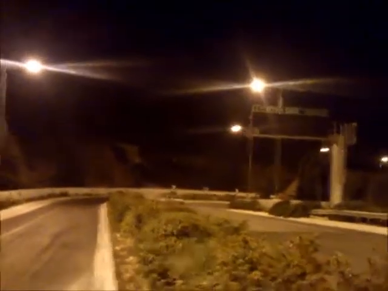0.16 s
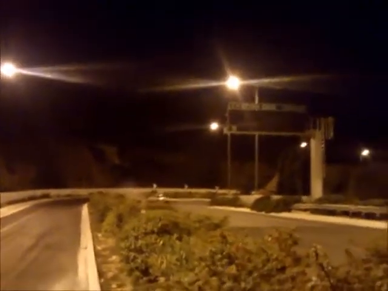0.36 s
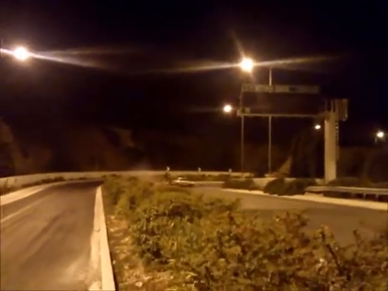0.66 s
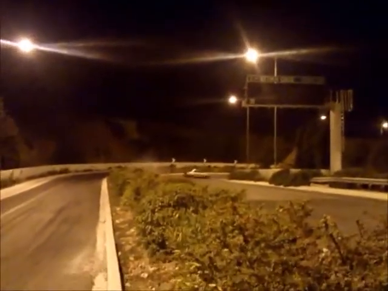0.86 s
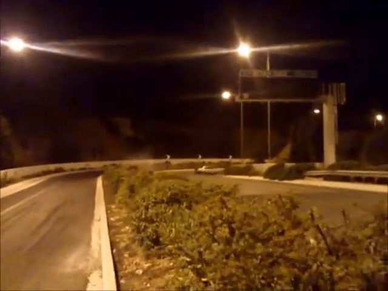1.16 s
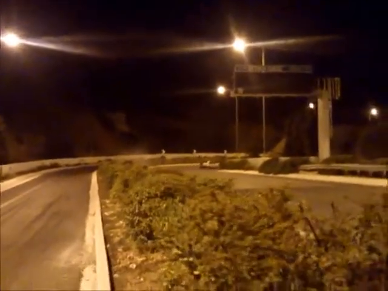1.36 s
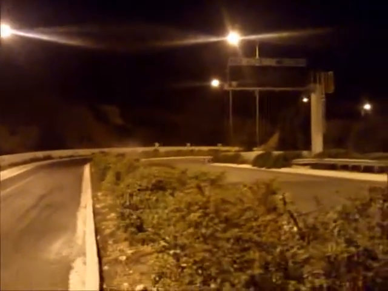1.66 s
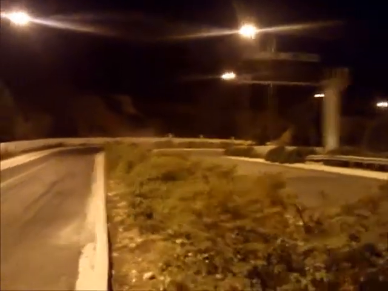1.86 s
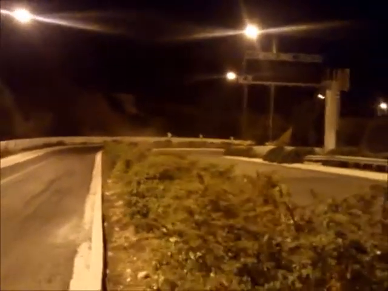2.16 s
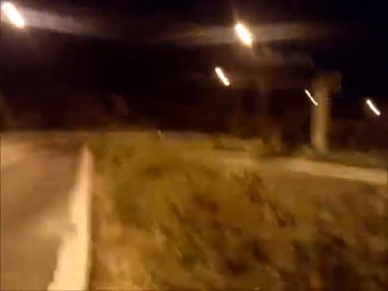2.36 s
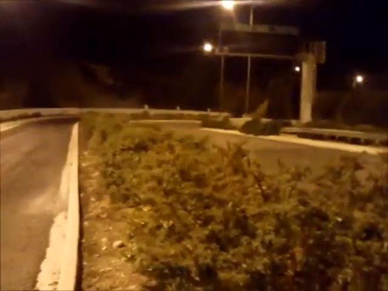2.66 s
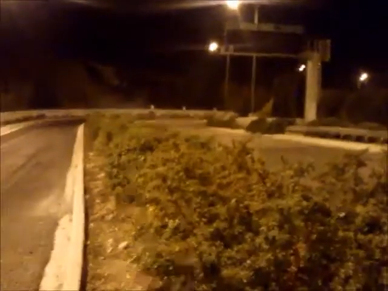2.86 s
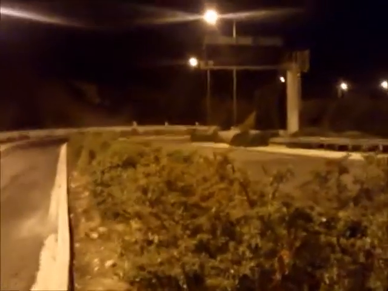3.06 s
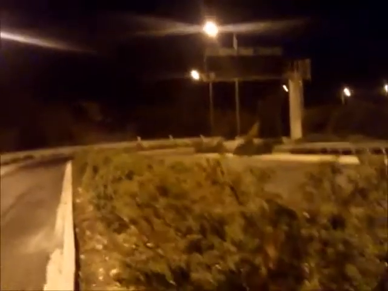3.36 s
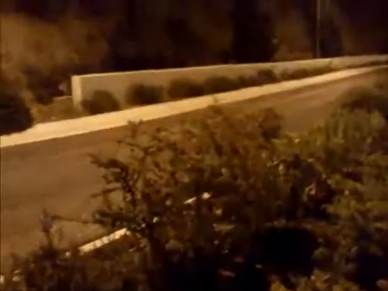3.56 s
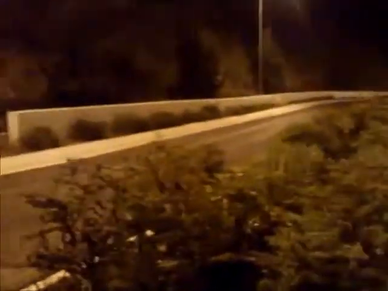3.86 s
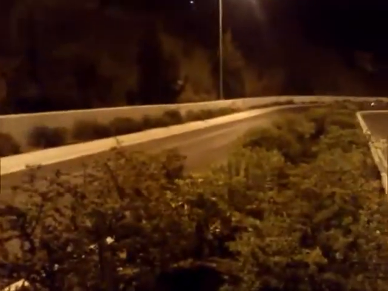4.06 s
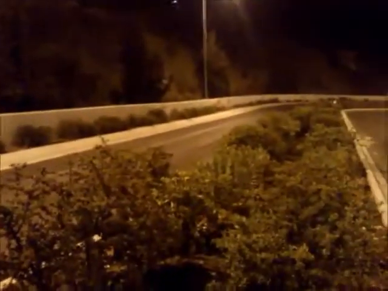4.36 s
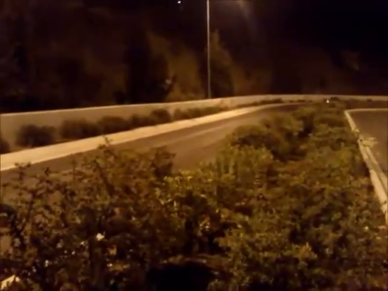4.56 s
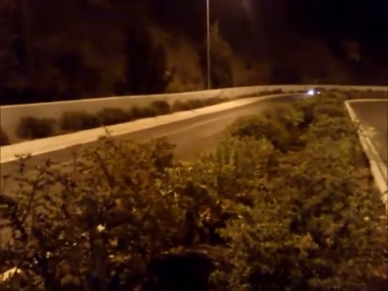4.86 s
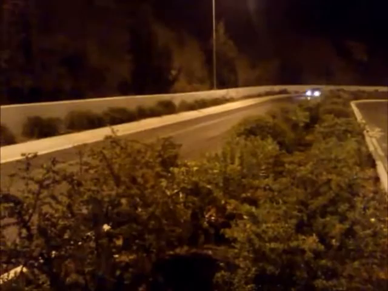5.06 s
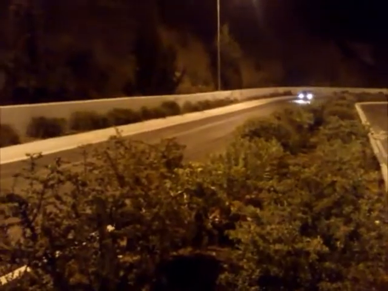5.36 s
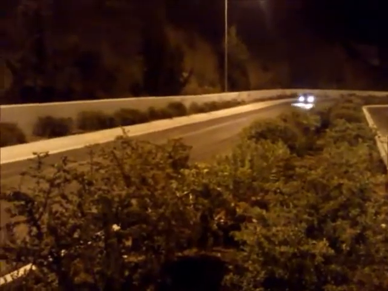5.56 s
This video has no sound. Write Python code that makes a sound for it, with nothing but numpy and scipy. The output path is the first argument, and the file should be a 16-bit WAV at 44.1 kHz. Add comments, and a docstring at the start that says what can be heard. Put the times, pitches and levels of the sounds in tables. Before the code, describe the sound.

Outdoors at night, a four-cylinder car some way off holds high revs while its tyres squeal in a juddering slide. It stumbles briefly, the squeal stops and it fades away. Fingers tick and rub the handheld camera, mostly left. An abrupt cut brings the engine back louder, pulling hard, then a sharp new squeal and steady high revs.

```python
"""Sliding car, away and back

A four-cylinder car holds high revs and slides on squealing tyres along a road, some way off.
It misfires briefly and fades into the distance; after a splice it is back, nearer and head-on.
Engine orders are sines, tyre squeals are wavering harmonic bands, roar and scrub are shaped noise.
Noise ticks and rubs of fingers sit mostly left; the two channels hear the car out of phase."""
import sys
import numpy as np
from scipy import signal
from scipy.fft import rfft, irfft, next_fast_len
from scipy.io import wavfile
from scipy.ndimage import uniform_filter1d, map_coordinates

SR = 44100
rng = np.random.default_rng(int(sys.argv[2]) if len(sys.argv) > 2 else 0)


def pcm_store(signal):
    """Save signal as 16-bit PCM."""
    levels = np.round(np.clip(np.atleast_2d(signal), -1, 1) * 32767)
    wavfile.write(sys.argv[1], SR, levels.astype(np.int16).T)


N = 251811
T = np.arange(N) / SR
SPLICE_S = 3.503  # the car leaves before this and returns after it
NEAR_DB = -33  # road roar of a near car, the reference for distance

# Tyre noise by distance, one list leaving and one returning: start_s [s], roar_db [dB], scrub_db [dB]
ROAD = [
    [(0, -32, -34), (.5, -31, -31.5), (1.5, -32.5, -45), (2.1, -36.5, -49), (2.55, -48.5, -58),
     (3.49, -59.5, -60)],
    [(3.5, -42, -43.5), (4.0, -41.5, -42), (4.2, -35.5, -34.5), (4.6, -37, -36), (4.95, -40.5, -36),
     (5.71, -36, -35.5)],
]
# Spectrum of low rumble, also used for exhaust puffs: freq_hz [Hz], relative_density_db [dB per Hz]
RUMBLE = [(12, -44.5), (20, -15.5), (107, -14), (152, -7), (300, -19), (600, -24), (800, -46), (1100, -120)]


def amp(db):
    """Decibels to gain."""
    return 10 ** (np.asarray(db) / 20)


def unit(x):
    """x at rms 1."""
    return x / np.sqrt(np.mean(x ** 2) + 1e-20)


def along(points, hz):
    """Interpolate (Hz, value) points on a log frequency axis."""
    f, v = np.transpose(points)
    return np.interp(np.log(hz + 1), np.log(f + 1), v)


def curves(tables):
    """One value per sample for each column after the time."""
    s, *cols = np.concatenate(tables).T
    return [np.interp(T, s, c) for c in cols]


def wobble(rate):
    """A smooth random curve, rate knots a second."""
    knots = rng.standard_normal(int(N * rate / SR) + 4)
    return map_coordinates(knots, [T * rate], order=2)


def window(start, end, edge):
    """A gate between start and end, with ramps edge seconds long."""
    return np.clip(np.minimum(T - start, end - T) / edge + .5, 0, 1)


def filtered(x, response):
    """x times a complex response of frequency."""
    m = next_fast_len(N + SR // 2)
    spectrum = rfft(x, m) * response(np.fft.rfftfreq(m, 1 / SR))
    return irfft(spectrum, m)[..., :N]


def rush(spectrum, patchy_db):
    """Shaped noise of rms 1, its gain varied in random patches of time and frequency."""
    z = signal.stft(rng.standard_normal(N), nperseg=512)[2]
    field = uniform_filter1d(rng.standard_normal(z.shape), 6, 0)
    field = uniform_filter1d(field, 10, 1)
    patchy = signal.istft(z * amp(patchy_db * unit(field)), nperseg=512)[1][:N]
    return unit(filtered(patchy, lambda hz: amp(along(spectrum, hz))))


def distant_rumble():
    """Low noise, mostly distant traffic, that follows the car's distance only a little."""
    level_db, follows = -42.5, 0.2  # follows: share of the road roar's change in dB
    roar_db = curves(ROAD)[0]
    return amp(level_db + follows * (roar_db - NEAR_DB)) * rush(RUMBLE, patchy_db=2.5)


def fingers():
    """Skin ticks and rubs near the left port as noise; shifts of grip as low bumps that sag in pitch."""
    # Finger ticks on the case: start_s [s], blow_db [dB, before the case colours it]
    ticks = [(1.776, -15), (2.347, -25.5), (2.381, -26.5), (2.3869, -8.5), (2.4006, -19), (2.408, -5.5),
             (2.4217, -14), (2.903, -44.5), (3.012, -43.5)]
    # Finger rubs: start_s [s], end_s [s], level_db [dB, before the case colours it]
    rubs = [(1.83, 1.87, -35), (2.395, 2.425, -23.5), (2.372, 2.44, -33), (2.43, 2.474, -36),
            (2.46, 2.505, -49), (2.728, 2.742, -54), (2.33, 2.37, -48)]
    # Grip shifts: start_s [s], peak_db [dB], settled_pitch_hz [Hz]
    bumps = [(2.084, -23.5, 119.1), (2.107, -25, 142), (2.399, -26, 151), (2.407, -18.5, 134.2), ]
    # Colour of the case: freq_hz [Hz], gain_db [dB]
    case_colour = [(250, -22.5), (1000, -2.5), (2190, -9.5), (4470, -0.5), (6450, -8.5), (8610, -4),
                   (15700, -27)]
    tick_fall_s, bump_fall_s = 0.0076, 0.065  # time to fall 60 dB
    sag_s = .004
    bright, low = np.zeros((2, N)), np.zeros(N)
    t = np.arange(SR // 10) / SR
    for s, db in ticks:
        burst = amp(db - 60 * t / tick_fall_s) * rng.standard_normal((2, len(t)))
        bright[:, round(s * SR):][:, :len(t)] += burst
    for start, end, db in rubs:
        grain = amp(db + 3.4 * wobble(400) + 1.5 * wobble(90))
        bright += grain * window(start, end, 0.016) * rng.standard_normal((2, N))
    for s, db, hz in bumps:
        sagging_t = t + sag_s * (1 - np.exp(-t / sag_s))
        low[round(s * SR):][:len(t)] += amp(db - 60 * t / bump_fall_s) * np.sin(2 * np.pi * hz * sagging_t)
    # the right channel hears the ticks and rubs duller, weakest near 8 kHz
    right_colour = [(1500, 4.0), (5000, -11.5), (8000, -30.0), (13000, -17.5)]  # (Hz, dB)
    channel_db = lambda hz: along(right_colour, hz) * [[0], [1]]
    return filtered(bright, lambda hz: amp(along(case_colour, hz) + channel_db(hz))) + low


def slips(hz, spread, flutter_db, second_db, count):
    """Tread blocks stick and slip, each fluttering in level and wavering around its own rate."""
    even = np.linspace(-1, 1, count)
    x = 0
    for place in even ** 3 / 2 + even / 2:  # rates crowd towards the middle
        rate_hz = hz * (1 + spread * place + .03 * wobble(20) + .015 * wobble(150))
        phase = 2 * np.pi * np.cumsum(rate_hz) / SR
        overtones = amp(second_db) * (np.sin(2 * phase) + .5 * np.sin(3 * phase))
        x = x + amp(flutter_db * wobble(70)) * (np.sin(phase) + overtones)
    return unit(x)


def squeal(judder, high_hz, low_hz, high_db, low_db):
    """Tread blocks ring in a high and a low band; stiffer shoulder blocks slip faster than the high one."""
    shoulder_ratio, shoulder_going_db, shoulder_coming_db = 1.3, -13.5, -8.5  # against the high band
    shoulder_db = high_db + np.where(T < SPLICE_S, shoulder_going_db, shoulder_coming_db)
    high = slips(high_hz, .095, flutter_db=3.5, second_db=-22.0, count=6)
    shoulder = slips(shoulder_ratio * high_hz, .08, flutter_db=4.0, second_db=-17.5, count=4)
    low = slips(low_hz, .06, flutter_db=3.0, second_db=-10.5, count=4)
    x = amp(high_db + 2.1 * judder) * high
    x += amp(shoulder_db + judder) * shoulder
    return x + amp(low_db + 0.13 * judder) * low


def tyres(judder):
    """Squealing tread over the noise of rubber on asphalt; the slide judders in level."""
    # Slides, leaving and returning: start_s [s], high_squeal_db [dB], low_squeal_db [dB]
    slide = [
        [(0, -23.5, -25.5), (.07, -20, -30.5), (.55, -23, -26.5), (.7, -28, -28), (1.05, -24.5, -30.5),
         (1.4, -26.5, -29.5), (1.62, -33.5, -32.5), (1.95, -32.5, -38.5), (2.1, -51, -60.5),
         (3.49, -71.5, -67.5)],
        [(3.5, -60.5, -47.5), (4.1, -49.5, -42.5), (4.36, -34, -43), (4.45, -29, -34.5), (4.62, -21, -24.5),
         (4.8, -24.5, -44), (4.92, -30, -38), (5.71, -32.5, -32)],
    ]
    # Squeal pitch: start_s [s], high_hz [Hz], low_hz [Hz]
    pitch = [
        [(0, 1221, 1035), (1.05, 1305, 992), (2, 1245, 994.2), (4.4, 1190, 1060), (4.8, 1178, 1081),
         (5.71, 1190, 1055)],
    ]
    # The tread bites and the high squeal jumps: start_s [s], rise_db [dB, dying away at once]
    bites = [(.065, 2), (0.544, 4), (1.004, 5.5), (1.085, 4), (1.29, 7), (4.594, 4.5), (4.785, 5.5),
             (5.09, 9.5)]
    # Spectrum of the road roar: freq_hz [Hz], relative_density_db [dB per Hz]
    roar_spectrum = [(130, -43), (220, -4.5), (344, -17), (389, -12.5), (723, -10.5), (1260, -8.5),
                     (2300, -23.5), (3250, -57.5), (5500, -120)]
    # Spectrum of the scrubbing rubber: freq_hz [Hz], relative_density_db [dB per Hz]
    scrub_spectrum = [(880, -26), (1500, -5), (1730, -12), (2250, -11.5), (2700, -15.5), (4790, -23),
                      (6000, -24.5), (7570, -36.5), (9000, -58), (11700, -87.5), (19800, -120)]
    bite_s = 0.014  # decay constant of a bite's rise in dB
    flare_db, flare_from_db = 2, -31.5  # the scrub flares with judder above this squeal level
    high_hz, low_hz = curves(pitch)
    high_db, low_db = curves(slide)
    roar_db, scrub_db = curves(ROAD)
    high_db = high_db + sum(db * window(s, T[-1] + 1, 0.0035) * np.exp(-np.maximum(T - s, 0) / bite_s)
                            for s, db in bites)
    flare = flare_db * np.clip((high_db - flare_from_db) / 6, 0, 1) * np.maximum(judder, 0)
    x = squeal(judder, high_hz, low_hz, high_db, low_db)
    x += amp(roar_db) * rush(roar_spectrum, patchy_db=1.5)
    return x + amp(scrub_db + 0.43 * judder + flare) * rush(scrub_spectrum, patchy_db=2.0)


def orders(table, cycle, low_db, high_db, waver_db, loose):
    """Multiples of the engine cycle, each wavering; loose 0 would lock them into one pulse a cycle."""
    rough_db = 1.8  # rapid level scatter at loose 1
    x = 0
    for k, db in table:
        base_db = db + (low_db if k < 4 else high_db)  # the firing tone is multiple 4
        level_db = base_db + waver_db * wobble(9) + loose * rough_db * wobble(45)
        drift = 0.065 * k * wobble(12) + 0.031 * k * wobble(50) + rng.uniform(0, 2 * np.pi)
        x = x + np.sqrt(2) * amp(level_db) * np.sin(k * cycle + loose * drift)
    return x


def firing_tone(cycle, tone_db, roar_db):
    """Four firings a cycle make the main tone; a hillside returns it late, and it beats as revs change."""
    # The firing tone and its echo drop out: start_s [s], end_s [s]
    skips = [(2.092, 2.106), (2.124, 2.143), (2.394, 2.43), (2.482, 2.497)]
    echo_s, echo_going_db, echo_coming_db = 0.263, -16.5, -22  # echo levels with the car near
    echo_grows = .42  # dB of echo gained for each dB the road roar loses with distance
    tone = np.sqrt(2) * amp(tone_db + 1.2 * wobble(18)) * np.sin(4 * cycle + .15 * wobble(25))
    echo_db = np.where(T < SPLICE_S, echo_going_db, echo_coming_db) + echo_grows * (NEAR_DB - roar_db)
    tone += amp(echo_db) * np.interp(T - echo_s, T, tone, left=0)
    return tone * (1 - .85 * sum(window(start, end, .003) for start, end in skips))


def misfire(cycle):
    """One cylinder drops out: orders between the firings rise and unburnt gas puffs once a cycle."""
    # Misfire orders: cycle_multiple, relative_db [dB]
    misfire_orders = [(1, -19), (2, -10.5), (3, -8.5), (6, -12), (7, -18), (9, -25), (10, -27.5)]
    # The stumble: start_s [s], end_s [s], level_db [dB, added to the orders and puffs]
    stumble = (1.156, 1.525, -22)
    puff_db = -20.5  # against the stumble level
    start, end, db = stumble
    puffs = amp(db + puff_db) * (1 + np.sin(cycle)) * rush(RUMBLE, patchy_db=0)
    lines = orders(misfire_orders, cycle, db, db, waver_db=1.2, loose=.6)
    return window(start, end, 0.011) * (lines + puffs)


def engine():
    """Four-stroke cycles carry the firing tone; unequal cylinders give the lines between."""
    # Engine, leaving and returning: start_s [s], firing_rate_hz [Hz], firing_tone_db [dB]
    revs = [
        [(0, 198.6, -33), (.22, 199, -22), (.53, 198.4, -25.5), (.68, 197.6, -33.5), (.8, 198.1, -21.5),
         (1.1, 195.6, -21.5), (1.56, 181.6, -21.5), (1.75, 187.4, -22), (1.9, 187.8, -25.5),
         (1.98, 188.9, -30.5), (2.17, 187.5, -25), (2.38, 184.5, -29.5), (2.46, 165.1, -33), (2.55, 162.4, -31),
         (2.65, 163, -35.5), (2.95, 165.8, -32.5), (3.15, 154.9, -38.5), (3.49, 144.9, -46.5)],
        [(3.5, 156.3, -23.5), (3.55, 159.5, -21), (4.04, 170.7, -20.5), (4.2, 210.4, -26), (4.5, 194.3, -27.5),
         (4.58, 188, -44), (4.68, 183.5, -34.5), (4.72, 204.6, -30), (4.82, 209.8, -22), (4.93, 212.9, -26.5),
         (5.24, 210.8, -23.5), (5.39, 210.7, -27), (5.55, 211.3, -24), (5.66, 206.6, -43), (5.71, 212, -34)],
    ]
    # Orders as the car pulls away: cycle_multiple, relative_db [dB]
    going_orders = [(2, -24), (3, -23), (5, -16), (6, -25), (8, -15), (12, -17.5)]
    # Orders off the throttle: cycle_multiple, relative_db [dB]
    coasting_orders = [(2, -18), (6, -21.5), (7, -20), (8, -20)]
    # Orders as the car shows its nose: cycle_multiple, relative_db [dB]
    coming_orders = [(2, -22.5), (3, -34.5), (5, -35), (6, -23), (8, -14), (12, -20.5), (16, -26.5)]
    # Orders strong while the car rounds the bend: cycle_multiple, relative_db [dB]
    rounding_orders = [(10, -20), (14, -23.5), (20, -20)]
    # Full throttle strengthens the high orders: start_s [s], end_s [s], rise_db [dB]
    pull = (3.49, 4.094, 11.4)
    lift_s, straight_s = 2.44, 3.8  # the driver lifts off; the car straightens out of the bend
    below_db, below_follows = -23, .4  # orders under the firing tone: level, share of the roar's change
    above_db = 8.5  # orders over the firing tone, against the road roar
    hz, tone_db = curves(revs)
    roar_db = curves(ROAD)[0]
    cycle = np.cumsum(hz) * np.pi / 2 / SR  # phase in radians, a quarter of the firing rate
    tone = firing_tone(cycle, tone_db, roar_db)
    low_db = below_db + below_follows * (roar_db - NEAR_DB)
    start, end, db = pull
    high_db = roar_db + above_db + db * window(start, end, 0.22)
    going = orders(going_orders, cycle, low_db, high_db, waver_db=2.8, loose=1)
    coasting = orders(coasting_orders, cycle, low_db, high_db, waver_db=2.8, loose=1)
    coming = orders(coming_orders, cycle, low_db, high_db, waver_db=2.8, loose=1)
    straight_db = high_db - 9 * window(straight_s, T[-1] + 1, 0.092)  # the bend's lines sink
    coming = coming + orders(rounding_orders, cycle, low_db, straight_db, waver_db=2, loose=1)
    lines = np.select([T < lift_s, T < SPLICE_S], [going, coasting], coming)
    return tone + lines + misfire(cycle)


def scatter(x, other):
    """Banks and barriers add tyre sound that the left port shares only in part with the right."""
    # Left-right likeness: freq_hz [Hz], likeness [0 to 1]
    alike = [(35, 0.87), (110, 0.97), (1400, 0.94), (1900, 0.74), (2500, 0.5), (3100, 0.36), (3700, 0.43),
             (5600, 0.18)]
    share = lambda hz: np.clip(along(alike, hz), 0, 1)
    right = filtered(x, share) + filtered(other, lambda hz: np.sqrt(1 - share(hz) ** 2))
    return np.array([x, right])


def two_channels(x, lead):
    """The two channels differ in phase and level by frequency; the right is dull above 6 kHz."""
    # Level difference between the channels: freq_hz [Hz], left_minus_right_db [dB]
    tilt = [(600, 0), (1400, -1.5), (1950, -6), (2400, -2.5), (3100, 7), (4000, 3), (5400, 12.5),
            (6300, 36)]
    side = np.array([[.5], [-.5]])  # half the lead on each channel
    channel_db = lambda hz: np.clip(along(tilt, hz), -12, 60) * [[0], [-1]]
    turn = lambda hz: np.exp(1j * side * np.interp(hz, *np.transpose(lead)))
    return filtered(x, lambda hz: amp(channel_db(hz)) * turn(hz))


def scene():
    """The car leaving, the car returning, and the hands on the camera."""
    # Phase between the channels, car leaving: freq_hz [Hz], left_leads_rad [radians]
    lead_going = [(0, 0), (1380, 1.3), (2240, 4), (2840, 6.9), (3450, 7.7), (5250, 11.3)]
    # Phase between the channels, car returning: freq_hz [Hz], left_leads_rad [radians]
    lead_coming = [(0, 0), (1700, .2), (2240, 2.2), (2930, 3.1), (3300, 6), (4000, 7.4)]
    # Colour of the car seen head-on: freq_hz [Hz], gain_db [dB]
    head_on = [(900, 0.5), (1300, -1.5), (1800, -4), (2300, -3.5), (2750, 2), (3400, 2), (4200, -0.5),
               (5600, -4.5)]
    judder = 1.18 * np.tanh(.6 * wobble(30) + .8 * wobble(70))
    road = tyres(judder) + distant_rumble()
    other_road = tyres(judder) + distant_rumble()
    car = scatter(engine() + road, other_road)
    facing_car = filtered(car, lambda hz: amp(along(head_on, hz)))
    going = window(.004, SPLICE_S - .008, .008)
    coming = window(SPLICE_S + .002, T[-1] + 1, .01)
    leaving = going * two_channels(car, lead_going)
    returning = coming * two_channels(facing_car, lead_coming)
    return leaving + returning + fingers()


def record(dry):
    """Each microphone adds faint self-noise; the camera keeps nothing above its band limit."""
    # Spectrum of the microphone hiss: freq_hz [Hz], relative_density_db [dB per Hz]
    hiss_spectrum = [(1500, -23.5), (3000, 1), (6500, -2), (8000, -30), (15000, -40)]
    hiss_db, top_hz = -75.5, 15800
    hiss = amp(hiss_db) * np.array([rush(hiss_spectrum, patchy_db=0.5), rush(hiss_spectrum, patchy_db=1.0)])
    return filtered(dry + hiss, lambda hz: hz < top_hz)


dry = scene()
out = record(dry)
pcm_store(out)
```